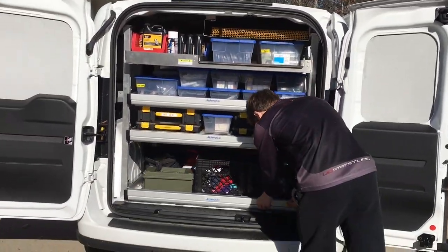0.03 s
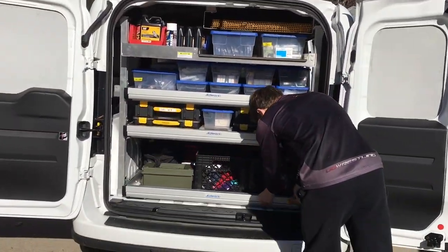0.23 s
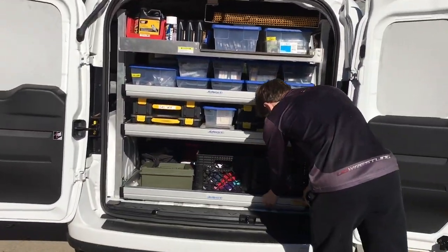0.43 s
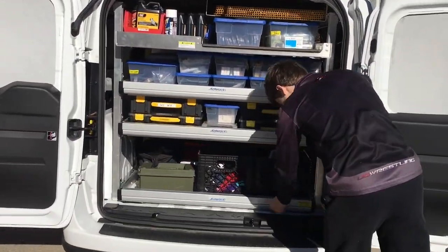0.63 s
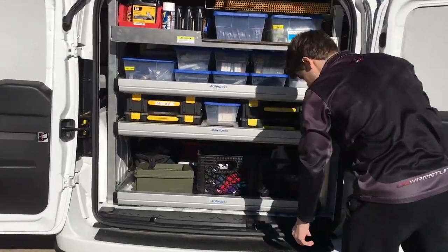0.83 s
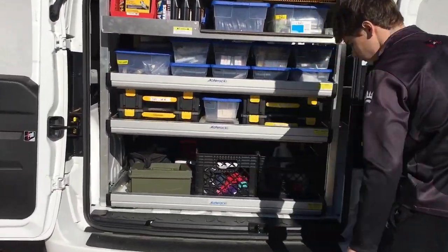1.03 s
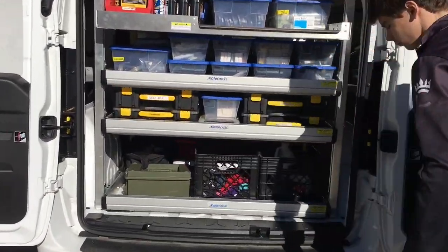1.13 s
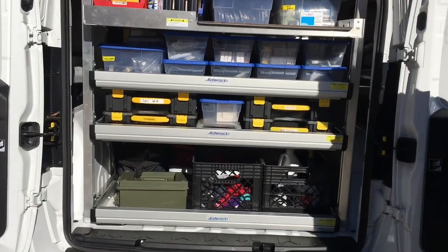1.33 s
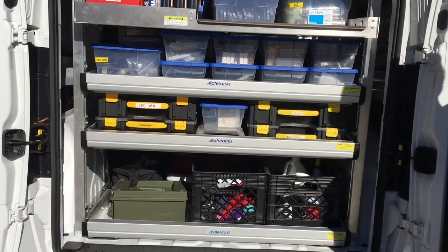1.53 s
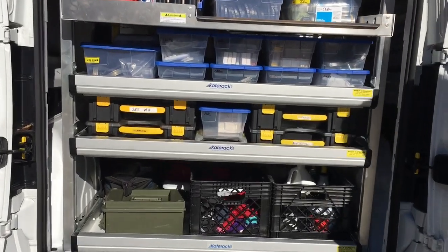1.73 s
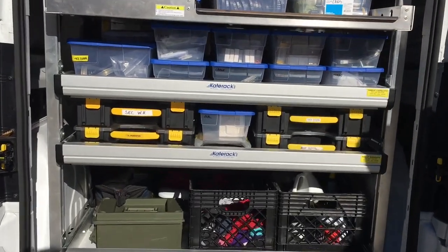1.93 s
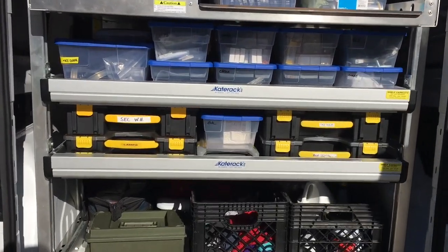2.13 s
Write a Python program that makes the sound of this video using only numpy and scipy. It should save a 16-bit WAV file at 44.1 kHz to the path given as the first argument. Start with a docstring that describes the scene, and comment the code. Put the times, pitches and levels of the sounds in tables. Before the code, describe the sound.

A loaded metal shelf slides shut in a van, latching with a loud clack before footsteps.

```python
"""First comes a low rolling drone with dull knocks: a loaded metal shelf slides home in the back of a van.
It touches lightly, then latches in a burst of hard hits that set the rack and the cargo bay ringing.
Shoes thud, scuff and crunch grit as someone steps aside, and clothes rustle at the end.
A low outdoor rumble lies under it all."""
import sys
import numpy as np
from scipy import signal
from scipy.fft import rfft, irfft, next_fast_len
from scipy.io import wavfile
from scipy.ndimage import uniform_filter1d

SR = 44100
rng = np.random.default_rng(int(sys.argv[2]) if len(sys.argv) > 2 else 0)


def pcm_store(signal):
    """Save signal as 16-bit PCM."""
    levels = np.round(np.clip(np.atleast_2d(signal), -1, 1) * 32767)
    wavfile.write(sys.argv[1], SR, levels.astype(np.int16).T)


N = 97020  # 2.2 s


def amp(db):
    """Turn decibels into a gain."""
    return 10 ** (np.asarray(db) / 20)


def unit(x):
    """Scale x to an average strength (rms) of 1."""
    return x / np.sqrt(np.mean(x ** 2) + 1e-20)


def along(points, hz):
    """Read a curve of (f/Hz, value) points at hz, on a log axis."""
    freqs, values = np.transpose(points)
    return np.interp(np.log(hz + 1), np.log(freqs + 1), values)


def level(points):
    """Join (t/s, level/dB) points into a gain for each sample."""
    return amp(np.interp(np.arange(N) / SR, *np.transpose(points)))


def fade(t, t60):
    """Die away by 60 dB in t60 seconds, the fade time."""
    return np.exp(-np.log(1000) * t / np.maximum(t60, 1e-4))


def swell(t, rise_s):
    """Climb smoothly from 0 towards 1."""
    return 1 - np.exp(-t / rise_s)


def filtered(x, response):
    """Give each frequency of x the gain response(hz)."""
    size = next_fast_len(len(x) + SR // 4)
    return irfft(rfft(x, size) * response(np.fft.rfftfreq(size, 1 / SR)), size)[:len(x)]


def noise(colour, size):
    """Noise of strength 1; its colour says which frequencies are strong."""
    return unit(filtered(rng.standard_normal(size), lambda hz: amp(along(colour, hz))))


def wobble(samples):
    """A random drift of strength 1, smoothed over this many samples."""
    return unit(uniform_filter1d(rng.standard_normal(N), size=samples))


def grainy(colour, depth_db):
    """Rubbing noise that catches in tiny grains, about a millisecond each."""
    return unit(amp(depth_db * wobble(40)) * noise(colour, N))


def dying(x, fades):
    """Let each frequency of x die at its own speed."""
    hz, t, bands = signal.stft(x, SR, nperseg=128)
    bands = bands * fade(t, along(fades, hz)[:, None])
    return signal.istft(bands, SR, nperseg=128)[1][:len(x)]


def ring(tones, t):
    """The fading tones of a struck object, their levels a little different at each blow."""
    return sum(amp(db + rng.normal(0, 1)) * fade(t, t60) * np.sin(2 * np.pi * hz * t)
               for hz, db, t60 in tones)


def thud(t, hz, t60):
    """One soft, fading tone."""
    return np.sin(2 * np.pi * hz * t) * fade(t, t60) * swell(t, rise_s=0.0017)


def add(out, start, x):
    """Mix x into out, beginning at start seconds."""
    part = out[max(round(start * SR), 0):][:len(x)]
    part += x[:len(part)]


RUMBLE_COLOUR = [(15, -26), (25, -29), (38, -7), (52, -4.5), (68, 1), (105, -7), (130, -10), (200, -15),
                 (260, -19.5), (350, -19.5), (450, -27.5), (880, -76)]  # distant rumble: f/Hz, level/dB
AIR_COLOUR = [(180, -47), (300, -10), (366, -6.5), (440, -16), (478, -5.5), (574, -7), (737, -7.5),
              (1060, -9.5), (2360, -18), (16000, -30)]  # soft air: f/Hz, level/dB
# how loud the rumble, air and hum are over time: t/s, level/dB
RUMBLE_LEVEL = [(0, -38), (.24, -46.5), (.33, -44.5), (.55, -53), (.7, -48), (1.05, -47), (1.35, -47.5),
                (1.65, -47), (2.0, -50), (2.2, -48.5)]
AIR_LEVEL = [(0, -55), (.55, -58), (.82, -61), (1.2, -58), (1.6, -59.5), (1.9, -59.5), (2.2, -60)]
HUM_LEVEL = [(0, -80), (.35, -46.5), (.6, -55.5), (.85, -49), (1.05, -61.5), (1.6, -58.5), (2.2, -65)]


def outdoors(hum_hz=154.5, hum_width_hz=21.7):
    """Distant rumble, soft air and a narrow band of noise heard as a wavering hum."""
    hum = filtered(rng.standard_normal(N), lambda hz: 1 / (1 + ((hz - hum_hz) / hum_width_hz) ** 2))
    rumble = level(RUMBLE_LEVEL) * noise(RUMBLE_COLOUR, N)
    air = level(AIR_LEVEL) * noise(AIR_COLOUR, N)
    return rumble + level(HUM_LEVEL) * unit(hum) + air


RUSTLE_LEVEL = [(1.85, -70), (2.0, -63.5), (2.12, -56), (2.2, -56)]  # loudness of the cloth: t/s, level/dB
RUSTLE_COLOUR = [(150, 0.5), (500, -2.5), (900, -8.5), (1600, -0.5), (2600, -8), (5000, -11.5), (9000, -14),
                 (16000, -31)]  # its colour: f/Hz, level/dB


def clothes():
    """Cloth rubs and rustles as someone moves close by."""
    return level(RUSTLE_LEVEL) * grainy(RUSTLE_COLOUR, depth_db=2.5)


FOOTFALLS = [(0.599, -36.5, 90), (0.701, -36, 58), (.835, -62, 69), (1.243, -49, 78)]  # feet landing: t/s, level/dB, f/Hz
SCUFFS = [(0.489, 0.021, 0.4, -57.5), (.665, 0.039, 0.26, -57), (.703, 0.018, 0.13, -57),
          (.752, 0.0056, 0.12, -55.5), (.858, 0.018, 0.21, -60.5), (1.392, .02, 0.16, -51.5),
          (1.664, 0.014, .15, -59), (1.765, 0.023, 0.14, -62)]  # peaks of the scrapes: t/s, rise/s, fade/s, level/dB
SCUFF_COLOUR = [(200, -10), (1000, 4.5), (2200, 3.5), (4000, 3.5), (6500, 2.5), (10000, -2.5),
                (16000, -9.5)]  # a scraping sole: f/Hz, level/dB


def shoes():
    """Soles thud on the pavement and scrape across it."""
    thuds, rubbing, t = np.zeros(N), np.zeros(N), np.arange(SR // 4) / SR
    for start, db, hz in FOOTFALLS:
        add(thuds, start, amp(db) * thud(t, hz, t60=0.12))
    for peak, rise, t60, db in SCUFFS:
        since = np.arange(N) / SR - peak
        rubbing += amp(db) * np.exp(np.minimum(since, 0) / rise) * fade(np.maximum(since, 0), t60)
    return thuds + rubbing * grainy(SCUFF_COLOUR, depth_db=4.5)


GRIT_CRACKS = [(.7195, -38, -55), (0.722, -41, -49.5), (.729, -44, -54), (.9215, -43, -58),
               (0.926, -49, -60), (0.9597, -50, -66), (1.038, -58, -74), (1.0855, -54, -58),
               (1.2446, -37.5, -55), (1.2461, -36.5, -50.5), (1.2549, -51, -67), (1.258, -50, -52),
               (1.3345, -47, -82), (1.342, -47.5, -72), (1.3729, -40.5, -56), (1.381, -48, -67),
               (1.452, -50, -53.5), (1.463, -55, -72), (1.8098, -48, -70), (1.95, -47.5, -68),
               (1.9978, -52, -65)]  # grains cracking: t/s, crack level/dB, ring level/dB
GRIT_COLOUR = [(300, 2), (1200, 0), (2400, -10), (3700, 2.5), (6000, 4.5), (9000, -3.5), (13000, -3.5),
               (16000, -18)]  # one crack: f/Hz, level/dB
PEBBLE_TONES = [(1340, -3, 0.026), (1680, -9.5, 0.057), (2320, -0.5, 0.029), (3520, -0.5, 0.037),
                (4080, -4, 0.022), (4360, -13, 0.035)]  # a ringing pebble: f/Hz, level/dB, fade/s


def grit():
    """Grit cracks under a sole: a sharp snap, a faint tail and the ring of a pebble."""
    out, t = np.zeros(N), np.arange(SR // 4) / SR
    snap_and_tail = fade(t, t60=0.0053) + amp(-13.5) * fade(t, t60=0.083)
    for start, crack_db, ring_db in GRIT_CRACKS:
        crack = noise(GRIT_COLOUR, len(t)) * snap_and_tail
        pebble = ring(PEBBLE_TONES, t * rng.normal(1, 0.011))  # a slightly new pitch each time
        add(out, start, amp(crack_db) * crack + amp(ring_db) * pebble)
    return out


BOOM_LEVEL = [(0, -42), (.035, -66), (.065, -44), (.105, -35.5), (.15, -41), (.178, -35), (.198, -31),
              (.215, -60), (.25, -100)]  # loudness of the van floor: t/s, level/dB


def floor_boom(pitch_hz=67, wander_hz=4.9):
    """The floor booms at a wandering pitch under the rolling shelf."""
    hz = pitch_hz + wander_hz * wobble(1500)
    return level(BOOM_LEVEL) * np.sin(2 * np.pi * np.cumsum(hz) / SR)


ROLL_LEVEL = [(0, -50), (.03, -50), (.07, -48), (.12, -44), (.148, -50), (.175, -49), (.195, -48),
              (.22, -58), (.3, -80)]  # loudness of the rolling: t/s, level/dB
ROLL_COLOUR = [(20, -24), (45, -9), (70, 1.5), (125, -1.5), (200, -10), (350, -18.5), (1500, -22.5),
               (5000, -46.5), (16000, -71)]  # its drone: f/Hz, level/dB
BUMPS = [(.108, -45), (0.12, -36.5)]  # soft bumps of the runners: t/s, level/dB
BUMP_COLOUR = [(100, -11), (270, 5), (600, 1), (1500, -13), (4000, -18), (14000, -59)]  # one bump: f/Hz, level/dB
LOAD_KNOCKS = [(.052, -38, 235, 0.042), (0.115, -45.5, 280.5, 0.19), (.169, -29.5, 181, .05),
               (.203, -35.5, 567, 0.11), (0.213, -33.5, 470, 0.08), (.258, -30.5, 260, .05)]  # dull knocks of the load: t/s, level/dB, f/Hz, fade/s


def rolling_shelf():
    """The shelf drones and bumps along its runners while its load knocks about."""
    out, t = level(ROLL_LEVEL) * noise(ROLL_COLOUR, N), np.arange(SR // 4) / SR
    bump_shape = swell(t, rise_s=0.0054) * fade(t, t60=0.074)
    for start, db in BUMPS:
        add(out, start, amp(db) * noise(BUMP_COLOUR, len(t)) * bump_shape)
    for start, db, hz, t60 in LOAD_KNOCKS:
        add(out, start, amp(db) * thud(t, hz, t60))
    return out


BAY_COLOUR = [(60, -21), (160, 2.5), (300, -6), (500, -23), (700, -18), (1000, -17.5), (1400, -15.5),
              (1800, -19.5), (2300, -15.5), (4000, -20.5), (12000, -20.5)]  # the cargo bay's echo: f/Hz, level/dB
BAY_FADES = [(150, .7), (500, 0.22), (1500, 0.63), (3000, 0.36), (6000, 0.49), (14000, 0.14)]  # how long it lasts: f/Hz, fade/s


def cargo_bay(blow):
    """The rack and the cargo bay ring on after the blow."""
    tail = dying(rng.standard_normal(SR), BAY_FADES)
    tail = filtered(tail / np.linalg.norm(tail), lambda hz: amp(along(BAY_COLOUR, hz)))
    return signal.fftconvolve(blow, tail)[:N]


# hits of shelf on latch: t/s, shelf level/dB, crack level/dB, rise/s, stretch of the fade times
HITS = [(0.1946, -34.5, -47, 0.0021, 2.1), (0.2353, -24.5, -46, 0.0014, 1.2),
        (0.241, -9, -14, 0.00064, 0.64), (.2462, -21, -25, .0003, 0.51),
        (0.2527, -15.5, -25, 0.00026, 0.72), (0.2614, -32, -22, 0.00043, 1.16),
        (.2642, -17.5, -22.5, 0.00028, 0.72), (0.2684, -19.5, -47, 0.00038, 0.65)]
SHELF_COLOUR = [(100, -35), (270, -11), (400, -21), (520, -20), (700, -10), (1050, -9), (1280, 0),
                (2050, -1), (2700, -11), (3350, -3), (4800, -20), (8000, -28), (16000, -40)]  # shelf tones, so crowded they blur into noise: f/Hz, level/dB
SHELF_FADES = [(250, 0.27), (700, 0.2), (1600, 0.091), (4000, 0.079), (12000, 0.15)]  # their length before stretching: f/Hz, fade/s
CRACK_COLOUR = [(500, -27.5), (2000, 3), (3400, 1.5), (5000, -4.5), (7000, -0.5), (9500, -1), (12000, 7),
                (16000, -6.5)]  # crack of the steel latch: f/Hz, level/dB
PANEL_BLOWS = [(.195, -27.5), (.2415, -9.5)]  # the first touch, then the shelf seating: t/s, level/dB
PANEL_PITCHES = [277, 576, 636, 867, 983, 1205, 1291, 1464, 1754, 1980, 2075, 2240, 3190, 3595]  # tones of the big panels: f/Hz
PANEL_LEVELS = [-12, -7.5, 0, -1.5, -8.5, -4.5, -4, -6.5, -4.5, -4.5, -4, -3.5, -9.5, -7]  # strength of each tone: level/dB
PANEL_FADES = [(280, 0.12), (700, 0.088), (2000, 0.096), (3600, 0.07)]  # how long the panels ring: f/Hz, fade/s


def latching_shelf():
    """Each hit cracks at the latch and rings the shelf; the big panels swell up more slowly."""
    out, t = np.zeros(N), np.arange(SR // 2) / SR
    for start, shelf_db, crack_db, rise, stretch in HITS:
        fades = [(hz, t60 * stretch) for hz, t60 in SHELF_FADES]
        shelf = amp(shelf_db) * dying(noise(SHELF_COLOUR, len(t)), fades)
        crack = amp(crack_db) * noise(CRACK_COLOUR, len(t)) * fade(t, t60=0.042 * stretch)
        add(out, start, (shelf + crack) * swell(t, rise))
    panel_tones = [(hz, db, along(PANEL_FADES, hz)) for hz, db in zip(PANEL_PITCHES, PANEL_LEVELS)]
    for start, db in PANEL_BLOWS:
        add(out, start, amp(db) * ring(panel_tones, t) * swell(t, rise_s=0.014))
    return out


def scene():
    """Everything as heard behind the van, in one channel."""
    blow = latching_shelf()
    van = blow + cargo_bay(blow) + rolling_shelf() + floor_boom()
    person = grit() + shoes() + clothes()
    return (van + person + outdoors())[None]


def record(dry):
    """Cut away the very highest treble."""
    top_hz, edge_hz = 15950, 90
    return np.array([filtered(x, lambda hz: (1 - np.tanh((hz - top_hz) / edge_hz)) / 2) for x in dry])


dry = scene()
out = record(dry)
pcm_store(out)
```